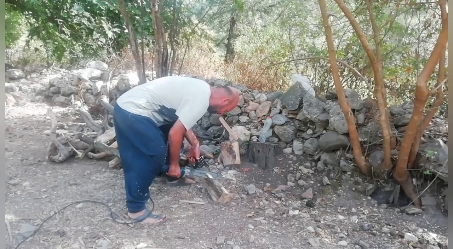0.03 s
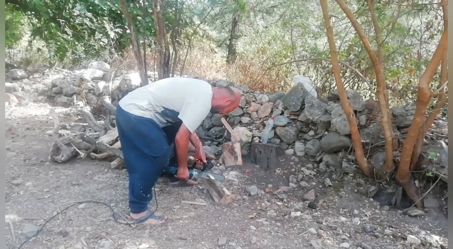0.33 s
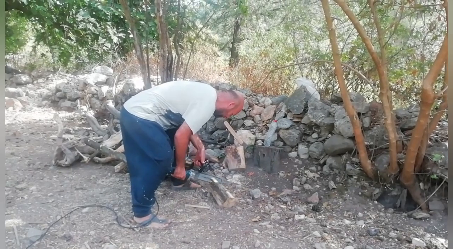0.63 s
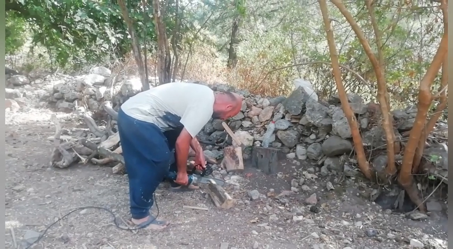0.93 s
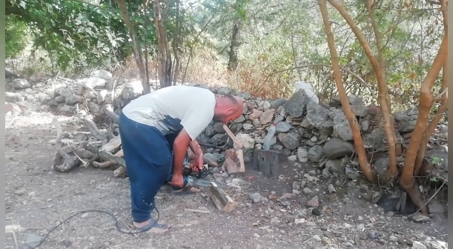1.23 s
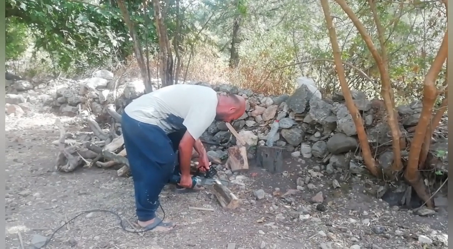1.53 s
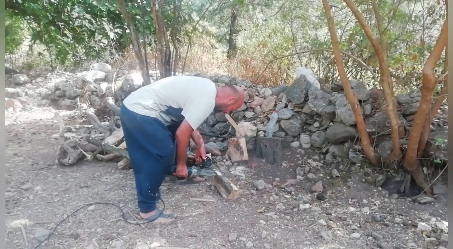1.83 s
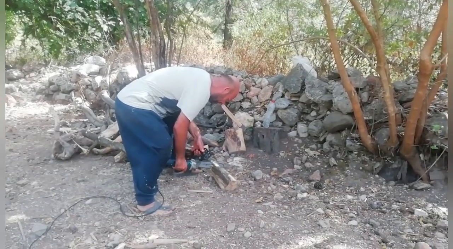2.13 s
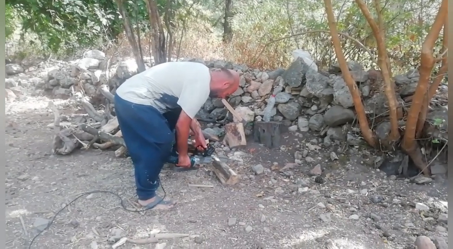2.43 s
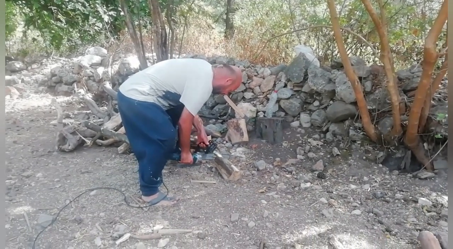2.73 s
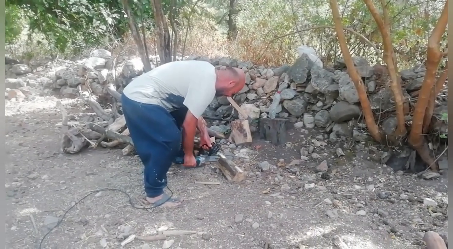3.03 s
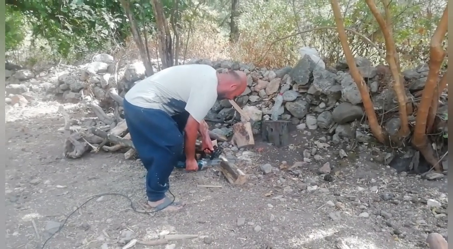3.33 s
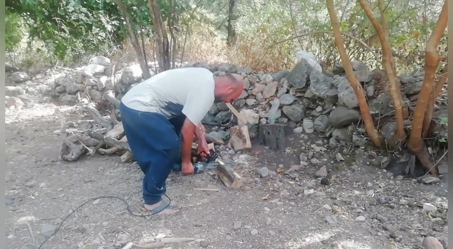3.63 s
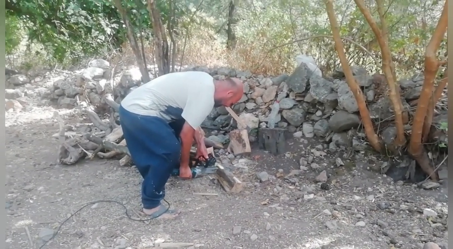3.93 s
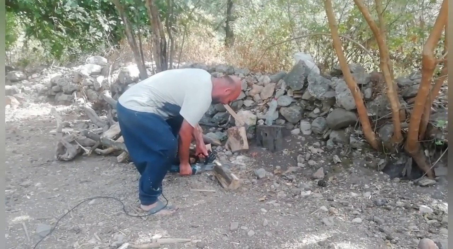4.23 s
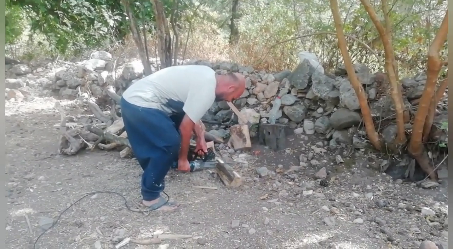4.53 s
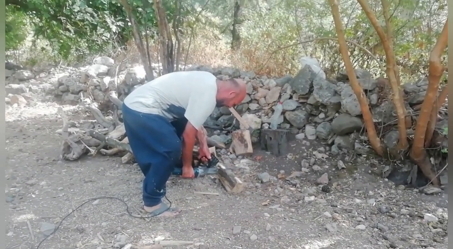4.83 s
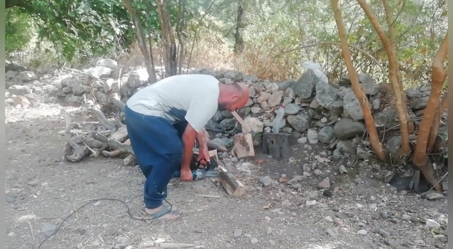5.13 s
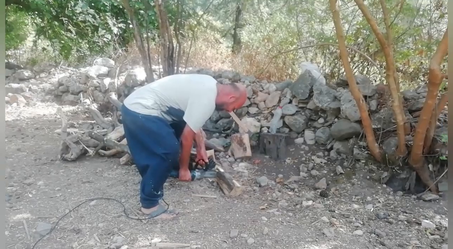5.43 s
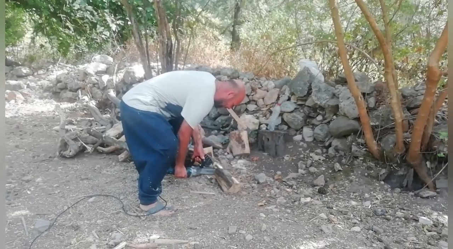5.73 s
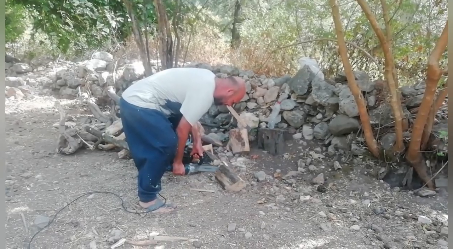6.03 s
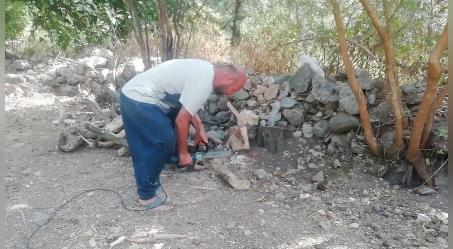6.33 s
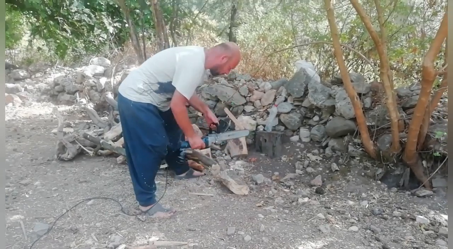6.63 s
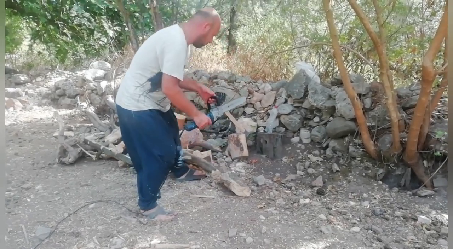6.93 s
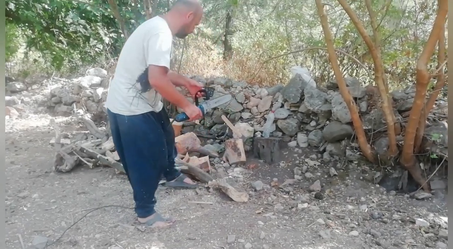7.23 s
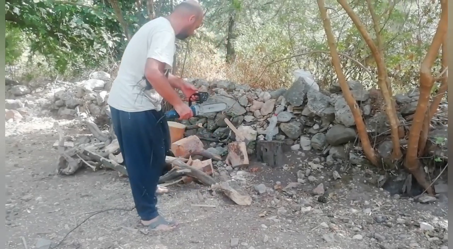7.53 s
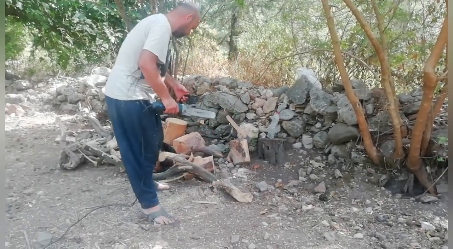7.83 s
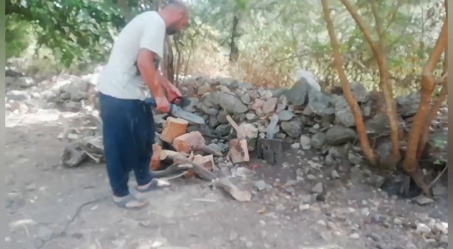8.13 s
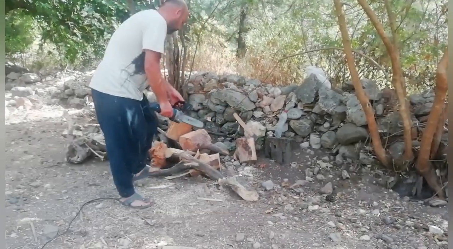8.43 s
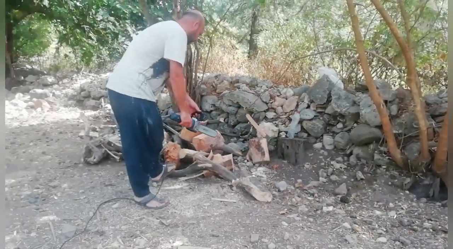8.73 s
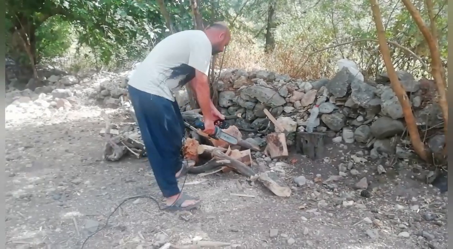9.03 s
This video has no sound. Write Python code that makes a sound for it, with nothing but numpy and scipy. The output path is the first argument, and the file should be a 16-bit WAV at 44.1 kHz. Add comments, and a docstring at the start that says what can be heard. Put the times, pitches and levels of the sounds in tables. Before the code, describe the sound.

An electric chainsaw chatters as it cuts wood, then runs free with a thinner whine, while light wind buffets the microphone.

```python
"""A small electric chainsaw cuts a log on stony ground, a few metres to the left of a stereo microphone.
The chain rattles and rings on its bar, the cutters chatter in the kerf, and the log's resonances sink
as the cut deepens. Near 6 s the saw comes free, speeds up and is lifted, so its ground echo sweeps.
Motor and fan whine underneath, stones throw back short echoes, and a breeze rumbles on the microphone."""
import sys
import numpy as np
from scipy import signal
from scipy.fft import rfft, irfft, next_fast_len
from scipy.io import wavfile
from scipy.ndimage import uniform_filter1d

SR = 44100
rng = np.random.default_rng(int(sys.argv[2]) if len(sys.argv) > 2 else 0)


def output_pcm(signal):
    """Save a mono or channel-first signal as 16-bit PCM at the path in sys.argv[1].

    Samples are clipped to [-1, 1] before scaling.
    """
    pcm = np.clip(np.atleast_2d(signal).T, -1, 1) * 32767
    wavfile.write(sys.argv[1], SR, np.round(pcm).astype(np.int16))


N = 399987

# speed of the motor: time_s, turns_per_s
MOTOR_SPEED = [(0, 425), (.8, 430), (1.5, 405), (2.1, 415), (2.8, 390), (3.8, 400), (5.85, 358),
               (6.08, 394), (6.27, 411), (6.53, 421), (6.8, 435), (7.0, 431), (7.25, 416), (7.55, 408),
               (8.0, 405.5), (8.4, 411), (9.07, 414)]
# bite of the cutters: time_s, load (0-1), bounces_per_s
CUTTER_BITE = [(0, 1, 84), (.6, 0.99, 83), (1.5, 0.9, 68.5), (2.1, 0.99, 97), (3, 0.95, 38.3),
               (4.4, 0.93, 41.3), (5.2, 0.97, 32.5), (5.87, 0.8, 38), (6.05, 0.26, 25), (6.4, 0.21, 47.3),
               (9.07, 0.02, 38)]
# chain running on the bar: time_s, relative_db
CHAIN_LEVEL = [(0, -24), (.2, -24.5), (.3, -25), (.72, -25), (.95, -26.5), (1.25, -26), (1.5, -26),
               (1.64, -28), (1.72, -25), (1.95, -25), (2.06, -26), (2.15, -24.5), (2.42, -25), (2.52, -27),
               (2.62, -24), (2.71, -24.5), (2.8, -28), (2.95, -26), (3.15, -27), (3.26, -23.5),
               (3.45, -27.5), (3.63, -24), (3.76, -28.5), (3.9, -25), (4.2, -27), (4.55, -25.5),
               (4.85, -26), (5.1, -26), (5.61, -25), (5.68, -27.5), (5.86, -24.5), (5.95, -27.5),
               (8.06, -26.5), (9.07, -27)]
# spectrum of the chain in the wood: frequency_hz, relative_db
LOADED_CHAIN_COLOUR = [(150, -15), (400, -13.5), (560, -16), (800, -13.5), (2650, -12), (4500, -9.5),
                       (6000, -6.5), (6600, -2.5), (7140, -2), (7680, -2), (8490, 3.5), (11000, -9),
                       (15800, -21)]
# spectrum of the chain in the air: frequency_hz, relative_db
FREE_CHAIN_COLOUR = [(200, -33), (600, -32), (900, -25), (2650, -24.5), (4500, -4.5), (4970, -7.5),
                     (5350, -2.5), (6000, -1), (6600, 0), (7140, 1), (7480, 3.5), (8050, 4.5), (10900, -5),
                     (12200, -12.5), (13100, -8), (14300, -13), (15200, -28), (15800, -9)]
# modes of the steel bar, levels against the chain: loaded_hz, free_hz, width_hz, loaded_db, free_db
STEEL_MODES = [(5550, 5300, 380, -19, -24), (6620, 5950, 340, -12, -14), (7800, 7930, 260, -8.5, -10),
               (8420, 8600, 300, -12, -15)]
# the bar's modes shift as it is wedged: time_s, pitch_ratio
STEEL_SHIFT = [(0, .99), (.6, 1.012), (1.3, 1.025), (1.9, .992), (2.9, .965), (3.5, .99), (4.2, 1.008),
               (4.6, .998), (5.5, 1.005), (7.3, 1.005), (8.3, .988), (9.07, 1)]
# the bar rings out: start_s, length_s, from_hz, to_hz, width_hz, level_db
STEEL_RINGS = [(1.3, .27, 8560, 8640, 520, -29), (1.28, .34, 7950, 7950, 330, -30),
               (2.25, .24, 8420, 8380, 400, -34), (4.45, .5, 7730, 7760, 260, -36),
               (5.0, .7, 7830, 7830, 260, -31), (5.2, .45, 8650, 8650, 700, -32.5),
               (6.9, .85, 7970, 8060, 170, -34), (2.93, .25, 10350, 10300, 400, -41),
               (3.15, .28, 9550, 9550, 450, -37), (6.68, .3, 9330, 9380, 400, -39),
               (6.88, .25, 5300, 5150, 260, -41)]

# how hard the cutters shake the log: time_s, level_db
CUTTER_PUSH = [(0.0, -40.5), (0.22, -30), (0.25, -36), (1.56, -40.5), (2.0, -49), (2.02, -69), (2.44, -35),
               (2.53, -56), (2.63, -37), (2.8, -41.5), (3.72, -35), (3.75, -42.5), (4.54, -37.5),
               (4.6, -39.5), (5.15, -37), (5.28, -54), (5.35, -38), (5.54, -50), (5.56, -35), (6.1, -62)]
# progress of the cut: time_s, depth (0-1)
CUT_DEPTH = [(0, 0), (2.4, .32), (3.3, .61), (3.8, .85), (5.9, 1)]
# log modes, levels against the push: uncut_hz, through_hz, width_hz, uncut_db, buried_db, through_db
WOOD_MODES = [(451, 302, 36, -7, -3.5, -15), (910, 735, 160, -8, -1.5, -2.5),
              (264.4, 208.6, 33, -10.5, -15, -9)]
# spectrum of tearing wood: frequency_hz, relative_db
TEARING_COLOUR = [(120, 3), (300, -3.5), (430, 13), (490, -12), (570, 19), (660, 6), (1000, -2.5),
                  (1500, 4.5), (2500, 0.5), (3500, -5.5), (4500, -16), (6000, -35)]
# the bar rubs and squeals in the kerf: start_s, length_s, from_hz, to_hz, width_hz, level_db
KERF_SQUEALS = [(0, 1.76, 1870, 1890, 240, -44), (.22, .36, 2290, 2290, 240, -40),
                (.3, .3, 1700, 1750, 250, -43), (.65, .26, 1895, 1880, 110, -38),
                (.85, .9, 3660, 3640, 190, -40), (1.68, .14, 3300, 3250, 150, -42),
                (2.02, .445, 3570, 3550, 220, -33.5), (2.1, .64, 4050, 4000, 400, -40),
                (2.52, .22, 3480, 3330, 140, -42), (2.87, .19, 1345, 1335, 40, -40.5),
                (3.25, .16, 1325, 1315, 40, -46), (2.4, 1.77, 2168, 2150, 220, -42),
                (2.8, 1.25, 1790, 1820, 90, -47), (3.0, .4, 800, 780, 110, -41),
                (4.9, 1.0, 212, 198, 12, -50), (2.62, .45, 4220, 4170, 220, -42),
                (3.2, 3.3, 3740, 3620, 180, -42.5), (3.8, .6, 1130, 1150, 150, -47),
                (4.85, .35, 1180, 1150, 150, -47)]
# resonances of the bar in the kerf: pitch_hz, width_hz, level_db
KERF_RESONANCES = [(1134, 160, -51.5), (1673, 240, -48.5), (1960, 160, -48), (2336, 400, -46.5),
                   (2836, 340, -46.5), (3630, 430, -46.5), (4300, 370, -48), (5380, 730, -44.5)]
# the bar bounces hard on the wood: start_s, relative_db
HARD_BOUNCES = [(3.053, -38), (3.069, -31), (3.166, -40), (3.228, -33), (3.263, -35), (3.348, -36),
                (3.403, -31), (3.433, -31), (3.591, -33), (3.624, -28), (3.645, -27), (3.706, -25.5),
                (3.827, -41), (3.934, -32), (4.029, -30.5), (4.064, -33), (4.119, -32), (4.204, -32.5),
                (4.222, -27), (4.282, -35), (4.321, -31), (4.372, -37), (4.409, -37), (4.432, -28.5),
                (4.455, -25), (4.482, -29), (4.503, -31), (4.606, -39), (4.782, -32), (4.856, -36),
                (4.897, -29.5), (4.925, -32), (4.973, -30), (4.999, -32), (5.016, -29.5), (5.044, -31),
                (5.083, -33), (5.116, -29.5), (5.129, -26), (5.154, -27), (5.339, -36), (5.554, -30),
                (5.706, -36), (5.833, -32)]
# a cutter snags: start_s, clatter_db, crack_db
CUTTER_SNAGS = [(.739, -22, -35), (1.327, -22, -32), (1.936, -21, -38), (2.407, -20, -34),
                (2.637, -23, -35), (2.93, -17, -31), (2.95, -24, -38), (3.016, -24, -37),
                (3.048, -18.5, -35), (3.119, -23, -40), (3.19, -24, -32), (3.405, -25, -33.5),
                (3.611, -25, -31), (3.669, -25, -30), (3.88, -26, -32), (3.938, -24, -32),
                (4.222, -29, -32), (4.53, -25, -40), (4.8, -28, -34), (4.998, -28, -30), (5.13, -22, -31),
                (5.158, -24, -32), (5.201, -24, -42), (5.29, -23, -40), (5.316, -24, -31),
                (5.335, -23, -39), (5.46, -25, -30), (5.578, -21, -34), (5.604, -20, -30),
                (5.665, -24, -32)]
# spectrum of the chain's clatter at a snag: frequency_hz, relative_db
CLATTER_COLOUR = [(2000, -10.5), (5000, -16), (6400, -2.5), (7100, -7), (8300, 2.5), (11000, -12.5),
                  (16000, -33)]
# spectrum of the wood's crack at a snag: frequency_hz, relative_db
CRACK_COLOUR = [(80, -30), (200, -5), (800, -3), (2300, 2), (4200, 1), (7000, -18), (12000, -30)]
# the chain sticks and chirps as the kerf closes: start_s, length_s, relative_db
KERF_CHIRPS = [(5.063, .018, -34), (5.11, .03, -32), (5.338, .018, -37), (5.357, .017, -35),
               (5.396, .015, -35), (5.426, .02, -36), (5.458, .016, -35), (5.55, .019, -28.5),
               (5.62, .019, -32), (5.66, .025, -31.5), (5.73, .018, -30), (5.75, .042, -32),
               (5.803, .024, -31.5), (5.832, .028, -32), (5.866, .02, -38), (5.895, .028, -38)]
# falling pitch of the chirps: time_s, pitch_hz
CHIRP_GLIDE = [(5.05, 1730), (5.45, 1685), (5.67, 1610), (5.9, 1555)]

# hum of the rotor: time_s, level_db
ROTOR_HUM = [(0, -52), (1.0, -50.5), (2.1, -55.5), (2.9, -50), (3.9, -57), (5.9, -55), (6.4, -51),
             (7.0, -49.5), (7.5, -48.5), (8.1, -50), (8.35, -55), (9.07, -53)]
# sprocket tone and an overtone near four times the motor speed: time_s, sprocket_db, overtone_db
MOTOR_TONES = [(0, -56, -58), (5.8, -55, -60), (6.0, -47, -60), (6.35, -47.5, -58), (6.55, -53, -56),
               (7.5, -50, -55), (7.9, -51, -45), (8.2, -52, -51), (8.5, -48, -53), (9.07, -47, -47)]
# whines of fan and gear: time_s, fan_db, gear_db
MOTOR_WHINES = [(0, -54, -58), (6.22, -52, -58), (6.32, -36, -55), (6.48, -41, -54), (6.62, -36.5, -54),
                (6.84, -35.5, -50), (7.0, -42, -38), (7.15, -44, -50), (7.45, -44, -55), (7.63, -45, -39),
                (7.85, -47, -52), (8.1, -35.5, -50), (8.25, -37.5, -50), (8.45, -42, -51), (8.75, -42, -52),
                (9.0, -40.5, -52)]
# rattle of the gear: time_s, relative_db
GEAR_LEVEL = [(5.95, -38.5), (6.4, -35.5), (6.8, -35.5), (8.1, -36), (8.5, -37.5), (9.07, -36.5)]
# spectrum of the gear rattle: frequency_hz, relative_db
GEAR_COLOUR = [(150, -60), (330, -7), (570, -4), (720, 0), (950, 4), (1400, 1.5), (2000, 2.5), (3000, 7),
               (3500, 5.5), (4200, -1), (4900, -43), (6000, -33)]
# bright, wandering peaks in the rattle of the free-running saw: pitch_hz, width_hz, relative_db
FREE_RUN_PEAKS = [(3010, 210, -28), (3740, 250, -9), (4890, 250, -6)]
# whirring bands that swell and glide with the ground echo as the running saw is lifted:
# start_s, length_s, from_hz, to_hz, width_hz, level_db
GROUND_ECHO_WHIRRS = [(6.3, 0.28, 1910, 1526, 261, -41.5), (6.53, 0.45, 990, 836, 194, -38),
                      (6.75, 0.41, 1320, 1220, 189.4, -41), (7.0, 1.4, 1022, 1114, 190, -44.5),
                      (7.1, 0.93, 1370, 1480, 228, -39.5), (8.4, 1.57, 779, 760, 150, -43),
                      (8.6, 0.9, 1290, 1600, 192, -39.5), (6.68, 0.18, 1800, 1720, 130, -44),
                      (7.0, 0.22, 1709, 1692, 110, -41)]
# thin hiss of the unloaded chain: time_s, level_db
CHAIN_SIZZLE = [(0, -80), (5.9, -70), (6.5, -60), (7.1, -51), (7.5, -42), (7.8, -56), (8.3, -57),
                (8.7, -44), (9.07, -46)]

# the ground echo comes later the higher the saw is held: time_s, lag_ms
GROUND_LAG = [(0, 1.08), (3, 0.36), (6.15, 0.43), (6.4, 0.5), (6.6, 0.96), (6.8, 1.31), (7.0, 1.8),
              (7.3, 2.12), (7.7, 1.98), (8.2, 1.73), (8.6, 1.61), (9.07, 1.34)]
# tone of the ground echo: frequency_hz, relative_db
GROUND_COLOUR = [(1500, 4.5), (2500, -9.0), (8000, -16)]
# porous ground swallows a band of the grazing sound: frequency_hz, gain_db
GROUND_NOTCH = [(450, 0), (500, -14), (590, -14), (660, 0)]
# echoes off a dry-stone wall and rocks, against the direct sound: lag_ms, level_db
STONE_ECHOES = [(2.3, -15), (3.9, -15), (7.1, -17)]
# shadow on the microphone's right port: frequency_hz, left_over_right_db
PORT_SHADOW = [(150, -1), (400, 2.5), (740, 12), (1200, 11.5), (2200, 7), (3000, 19), (4000, 6),
               (5500, 20.5), (7800, 27.5), (10000, 21.5), (13000, 16), (15500, 21)]
# the right port hears the saw later: frequency_hz, lag_rad
PORT_LAG = [(20, 0), (200, .8), (400, 1.6), (720, 3.1), (1200, 6.3), (2500, 8.6), (3500, 7.8), (4100, 9.4),
            (5500, 11.6), (6300, 16.6), (7200, 18.7), (8100, 22), (9000, 24.9), (15500, 27)]
# what reaches the right port directly: frequency_hz, share (0-1)
PORT_DIRECT = [(200, 1), (800, 0.9), (2000, 0.87), (3100, 0.4), (4100, 0.7), (5600, 0), (7000, 0.7),
               (9000, 0.3), (11000, 0.2)]
# puffs of breeze on the microphone: start_s, hold_s, level_db
BREEZE_PUFFS = [(.01, 0.03, -28.5), (.07, 0.094, -30), (0.38, 0.1, -32), (0.542, .03, -32),
                (0.595, 0.24, -41), (0.806, .05, -32), (0.918, 0.086, -34.5), (1.059, .1, -33.5),
                (1.25, 0.027, -31), (1.357, .05, -33), (1.457, .05, -33.5), (1.543, 0.033, -35.5),
                (1.602, 0.031, -28), (1.709, 0.045, -31), (1.843, .02, -37.5), (1.989, 0.12, -34.5),
                (2.305, 0.063, -41), (2.434, 0.21, -34), (2.688, .09, -38.5), (2.808, 0.019, -32.5),
                (2.941, 0.16, -43.5), (3.122, 0.23, -52), (3.742, .21, -37), (4.175, 0.089, -38.5),
                (4.332, 0.16, -32), (4.499, 0.094, -32), (4.739, 0.022, -45), (4.99, 0.074, -54),
                (5.106, 0.072, -42), (5.455, 0.047, -36), (5.575, .04, -41), (5.627, .1, -47),
                (5.801, 0.11, -37), (5.91, .08, -43), (6.035, 0.024, -36), (6.242, 0.054, -43),
                (6.311, 0.062, -35), (6.475, 0.12, -36.5), (6.636, 0.089, -35.5), (6.789, 0.031, -40),
                (7.406, 0.048, -49), (7.47, 0.025, -40), (7.58, 0.043, -40.5), (7.687, 0.068, -40),
                (7.893, 0.048, -41), (7.983, 0.072, -47), (8.117, 0.021, -39.5), (8.16, 0.029, -39.5),
                (8.269, 0.052, -39.5), (8.567, 0.076, -49), (8.952, 0.096, -47.5)]
# steady air under the puffs: time_s, level_db
BREEZE_FLOOR = [(0, -44), (2.9, -53), (3.4, -60), (5.9, -52), (7.1, -68), (7.6, -54), (9.07, -60)]
# spectrum of the wind rumble: frequency_hz, relative_db
BREEZE_COLOUR = [(12, -1), (25, -1), (55, 3.5), (100, 0), (160, -5), (230, -11.5), (350, -36), (600, -31.5)]


def chain(speed, load, bites, trim_db=-0.23, bite_db=0.9, link_db=-1.5, flutter_db=0.62, slap_db=1.23):
    """Links knock over the sprocket and along the steel bar, harder at each bite, and set it ringing."""
    (level_db,), (shift,) = in_time(CHAIN_LEVEL), in_time(STEEL_SHIFT)
    links = np.cos(angle(2.2 * speed * (1 + 0.0499 * drift(63.7))))
    push = from_db(load * bite_db * bites + link_db * links
                   + flutter_db * drift(19) + slap_db * drift(250))
    force = grains(20000, 1.75) * push
    loaded = coloured(force, LOADED_CHAIN_COLOUR)
    free = ground_echo(coloured(force, FREE_CHAIN_COLOUR))
    steel = from_db(-1.92) * (np.sqrt(load) * loaded + 1.09 * np.sqrt(1 - load) * free)
    hits = grains(6000, 5.0) * push
    for loaded_hz, free_hz, width_hz, loaded_db, free_db in STEEL_MODES:
        hz = (load * loaded_hz + (1 - load) * free_hz) * shift * (1 + 0.005 * drift(4.8))
        steel += from_db(load * loaded_db + (1 - load) * free_db) * resonance(hits, hz, width_hz)
    return from_db(level_db + trim_db) * steel + swells(STEEL_RINGS, grains(6000, 2.4) * push)


def log_cut(load, bites, grip, grip_db=2, rasp_bite_db=3, ring_bite_db=2.5, buried_depth=0.8):
    """Cutters tear out chips; each bite shakes the log, while the bar rubs and squeals in the kerf."""
    (push_db,), (depth,) = in_time(CUTTER_PUSH), in_time(CUT_DEPTH)
    push_db = push_db + grip_db * grip
    rasp_db = push_db - 3 + depth  # the rasp gains 1 dB on the way through
    tearing = grains(8000, 2.6) * from_db(rasp_bite_db * bites)
    rasp = from_db(rasp_db) * load * coloured(tearing, TEARING_COLOUR)
    hits = grains(5000, 2.05) * from_db(ring_bite_db * bites)
    rubbing = grains(2500, 2.4) * from_db(bites)
    rings = swells(KERF_SQUEALS, rubbing, bend_widths=1.3, judder_widths=0.18)
    for uncut_hz, through_hz, width_hz, *mode_db in WOOD_MODES:
        level_db = push_db + np.interp(depth, [0, buried_depth, 1], mode_db)
        hz = uncut_hz + (through_hz - uncut_hz) * depth
        rings += from_db(level_db) * resonance(hits, hz, width_hz)
    return rasp + np.sqrt(load) * rings


def clacks(load, bites, bite_db=2):
    """Chips and links knock in the kerf, hardest at each bite; its resonances wander."""
    hits = grains(560, 1.9) * from_db(bite_db * bites)
    rings = 0
    for hz, width_hz, db in KERF_RESONANCES:
        gain = from_db(db + 2.5 * drift(3))
        rings += gain * resonance(hits, hz * (1 + .022 * drift(2)), width_hz)
    return load * rings


def knocks(trim_db=1.5, narrow_db=-22, kerf_db=-21):
    """Each hard bounce of the bar rings the log, chiefly its widest mode, and more faintly the kerf."""
    (times, levels_db), (depth,) = np.transpose(HARD_BOUNCES), in_time(CUT_DEPTH)
    blows, out = np.zeros(N), 0
    blows[(times * SR).astype(int)] = from_db(levels_db + trim_db)
    widest_hz = max(mode[2] for mode in WOOD_MODES)
    for uncut_hz, through_hz, width_hz, *_ in WOOD_MODES:
        hz = uncut_hz + (through_hz - uncut_hz) * depth
        out += from_db(narrow_db if width_hz < widest_hz else 0) * ring(blows, hz, width_hz)
    for hz, width_hz, _ in KERF_RESONANCES:
        out += from_db(kerf_db) * ring(blows * rng.standard_normal(N), np.full(N, hz), width_hz)
    return out


def snags(decay_s=.006, spike_s=.0005):
    """A cutter catches: the chain clatters briefly and the wood cracks."""
    age, out = np.arange(SR // 20) / SR, 0
    shape = np.exp(-age / decay_s) + np.exp(-age / spike_s)
    times, clatter_db, crack_db = np.transpose(CUTTER_SNAGS)
    for levels_db, colour in ((clatter_db, CLATTER_COLOUR), (crack_db, CRACK_COLOUR)):
        envelope = np.zeros(N)
        for start_s, db in zip(times, levels_db):
            envelope[int(start_s * SR) + np.arange(len(age))] += from_db(db) * shape
        out += filtered(envelope * rng.standard_normal(N), rms_one(from_db(per_bin(colour))))
    return out


def chirps(trim_db=-1, squeal_db=-43):
    """The chain sticks in the closing kerf: short, rough squeaks joined by a faint squeal."""
    (hz,), now, envelope = in_time(CHIRP_GLIDE), np.arange(N) / SR, np.zeros(N)
    for start_s, length_s, db in KERF_CHIRPS:
        span = slice(*np.searchsorted(now, [start_s, start_s + length_s]))
        progress = np.clip((now[span] - start_s) / length_s, 0, 1)
        envelope[span] += from_db(db) * np.sin(np.pi * progress) ** .5
    between = from_db(squeal_db) * uniform_filter1d((envelope > 0) * 1., size=SR // 20)
    roughness = 1 + .3 * drift(120)
    tone = np.cos(angle(hz * (1 + .02 * drift(70))))
    return from_db(trim_db) * np.hypot(envelope, between) * roughness * tone


def motor(speed, load, mains, air_db=-9):
    """Rotor and sprocket give wavering tones; the gear and a ten-bladed fan whine in a hiss of air."""
    (fan_db, gear_db), (sprocket_db, overtone_db) = in_time(MOTOR_WHINES), in_time(MOTOR_TONES)
    hum_db, = in_time(ROTOR_HUM)
    # the speed is nearly steady when free and stumbles in the wood
    rotor = angle(speed * (1 + .0012 * drift(8) + .025 * load * drift(20)))
    sprocket = from_db(sprocket_db + 2.5 * drift(12)) * np.cos(1.8 * rotor + .35 * drift(18))
    overtone = from_db(overtone_db + 2.5 * drift(10)) * np.cos(4.05 * rotor + .6 * drift(20))
    hum = from_db(hum_db + (1.5 + 2 * load) * drift(15)) * np.cos(rotor + .28 * drift(20))
    # torque ripple puts side tones round the fan's whine, the upper one the stronger
    blades = np.cos(10 * rotor + .5 * np.sin(mains) + .35 * drift(40))
    blades *= (1 + .8 * np.cos(mains)) * (1 + .35 * drift(20))
    gear = from_db(gear_db) * np.cos(12 * rotor + 1.2 * drift(40))
    air = resonance(rng.standard_normal(N), 10 * speed + 40, width_hz=220)
    fan = from_db(fan_db) * (blades + from_db(air_db) * air)
    return ground_echo(sprocket + overtone, strength=0.26) + hum + gear + fan


def gear_rattle(load, mains, mains_db=-1.1, muffle_db=-4):
    """The gear rattles, pulsing with the mains: quieter under load, with bright peaks when free."""
    level_db, = in_time(GEAR_LEVEL)
    force = grains(9000, 1.1) * from_db(mains_db * np.cos(mains) + 0.85 * drift(31))
    rattle = from_db(level_db + muffle_db * load + 1) * coloured(force, GEAR_COLOUR)
    peaks = sum(from_db(db) * resonance(force, hz * (1 + 0.018 * drift(2.2)), width_hz)
                for hz, width_hz, db in FREE_RUN_PEAKS)
    return ground_echo(rattle) + from_db(level_db) * (1 - load) * peaks


def whirr_and_sizzle(sizzle_hz=15300):
    """Whirring bands swell and glide as the saw is lifted; the loose chain sizzles along its groove."""
    sizzle_db, = in_time(CHAIN_SIZZLE)
    whirrs = swells(GROUND_ECHO_WHIRRS, grains(2500, 1.9))
    sizzle = resonance(rng.standard_normal(N), np.full(N, sizzle_hz), width_hz=1100)
    return whirrs + from_db(sizzle_db) * sizzle


def ground_echo(x, strength=0.42):
    """The stony ground sends back a duller copy; the comb it makes slides as the saw is lifted."""
    lag_ms, = in_time(GROUND_LAG)
    dull = filtered(x, from_db(per_bin(GROUND_COLOUR)))
    return x + strength * np.interp(np.arange(N) - lag_ms * SR / 1000, np.arange(N), dull)


def wall_echoes(paths, sway_ms=0.082, lowest_hz=900):
    """Short echoes off the nearby stones ripple the spectrum; their lags sway as the saw moves."""
    samples, out = np.arange(N), paths.copy()
    bright = signal.sosfilt(signal.butter(2, lowest_hz, "high", fs=SR, output="sos"), paths)
    for lag_ms, db in STONE_ECHOES:
        delayed = samples - (lag_ms + sway_ms * drift(.5)) * SR / 1000
        out += from_db(db) * np.array([np.interp(delayed, samples, path) for path in bright])
    return out / np.sqrt(1 + sum(from_db(db) ** 2 for _, db in STONE_ECHOES))


def microphone(direct, scattered):
    """The left port faces the saw; the shaded right hears it late, with scatter from the stones."""
    share, shade = np.clip(per_bin(PORT_DIRECT), 0, 1), from_db(-per_bin(PORT_SHADOW))
    late = shade * share * np.exp(-1j * per_bin(PORT_LAG))
    diffuse = shade * np.sqrt(1 - share ** 2)
    centre = np.sqrt(abs(1 + late) ** 2 + diffuse ** 2) / 2  # gain of the two ports' average
    left = filtered(direct, 1 / centre)
    right = filtered(direct, late / centre) + filtered(scattered, diffuse / centre)
    return np.array([left, right])


def breeze(attack_s=.01, release_s=.013, lumps_db=3, stereo_width=0.36):
    """Puffs of air thump on the microphone, nearly alike on both sides; each rises, holds and fades."""
    now = np.arange(N) / SR
    puffs, = from_db(in_time(BREEZE_FLOOR))
    for start_s, hold_s, db in BREEZE_PUFFS:
        span = slice(*np.searchsorted(now, [start_s - attack_s, start_s + hold_s + .5]))
        age = now[span] - start_s
        rise = np.clip(age / attack_s + 1, 0, 1)
        fall = np.exp(-np.maximum(age - hold_s, 0) / release_s)
        puffs[span] = np.hypot(puffs[span], from_db(db) * rise * fall)
    mid, side = coloured(rng.standard_normal((2, N)) * from_db(lumps_db * drift(36)), BREEZE_COLOUR)
    return puffs * (mid * from_db([[.6], [-.6]]) + stereo_width * side * [[1], [-1]])


def chatter(per_s, wander=0.1562, uneven=0.79):
    """The bar bounces in the kerf: uneven bites, one per bounce, swinging about zero."""
    bounce = angle(per_s * (1 + wander * drift(13.6)))
    bites = rms_one(np.cos(bounce) + .5 * np.cos(2 * bounce))
    return np.clip(bites * (1 + uneven * drift(40)), -2, 2)


def swells(rows, force, bend_widths=0, judder_widths=0):
    """Driven resonances each swell, glide and fade; pressure bends their pitch and judder shakes it."""
    out, now, shake = np.zeros(N), np.arange(N) / SR, judder_widths * drift(17)
    for start_s, length_s, from_hz, to_hz, width_hz, db in rows:
        span = slice(*np.searchsorted(now, [start_s, start_s + length_s]))
        progress = np.clip((now[span] - start_s) / length_s, 0, 1)
        pressure = 4 * progress * (1 - progress)
        bend = bend_widths * (pressure - pressure.mean())
        hz = from_hz + (to_hz - from_hz) * progress + width_hz * (bend + shake[span])
        out[span] += from_db(db) * np.sqrt(pressure) * resonance(force[span], hz, width_hz)
    return out


def ring(force, hz, width_hz):
    """A steep-sided resonance whose centre moves; a unit click rings at a height near 1."""
    turn = np.exp(1j * angle(hz))
    lowpass = signal.butter(2, width_hz / 2, fs=SR, output="sos")
    envelope = signal.sosfilt(lowpass, (force + 1e-18) / turn)
    return (envelope * turn).real * SR / (np.sqrt(2) * width_hz)


def resonance(force, hz, width_hz):
    """A moving resonance under a sustained force; rms 1."""
    return rms_one(ring(force, hz, width_hz))


def grains(per_s, spread_db):
    """Tiny impacts of uneven size at random moments; rms 1."""
    sizes = from_db(spread_db * np.minimum(rng.exponential(1, N), 4)) * rng.choice([-1, 1], N)
    return rms_one(sizes * (rng.random(N) < per_s / SR))


def drift(rate_hz):
    """A smooth random wander, drawn every 40 samples; rms near 1."""
    pole = np.exp(-80 * np.pi * rate_hz / SR)
    noise = rng.standard_normal(N // 40 + 2002)
    slow = signal.lfilter([1], [1, -2 * pole, pole * pole], noise)[2000:]
    return np.interp(np.arange(N) / 40, np.arange(len(slow)), rms_one(slow))


def coloured(x, spectrum):
    """Give a sound a spectrum; rms 1."""
    return rms_one(filtered(x, from_db(per_bin(spectrum))))


def filtered(x, response):
    """Pass a sound through a frequency response."""
    size = next_fast_len(N + SR // 4, True)
    return irfft(rfft(x, size) * response, size)[..., :N]


def per_bin(points):
    """A table over log frequency, read at every bin of a padded transform."""
    hz, value = np.transpose(points)
    size = next_fast_len(N + SR // 4, True)
    return np.interp(np.log(np.arange(size // 2 + 1) * SR / size + 1e-3), np.log(hz), value)


def in_time(rows):
    """Each column of a curve, sample by sample."""
    time_s, *columns = np.transpose(rows)
    return [np.interp(np.arange(N) / SR, time_s, column) for column in columns]


def angle(per_s):
    """Running phase of a rotation."""
    return 2 * np.pi * np.cumsum(per_s) / SR


def from_db(db):
    """Decibels to gain."""
    return 10 ** (np.asarray(db) / 20)


def rms_one(x):
    """Scale to rms 1."""
    return x / np.sqrt(np.mean(x ** 2) + 1e-20)


def scene():
    """Saw and log a few metres to the left, stones around them, breeze on the microphone."""
    (speed,), (load, bounces_per_s) = in_time(MOTOR_SPEED), in_time(CUTTER_BITE)
    bites = chatter(bounces_per_s)
    grip = drift(9)  # the hand's pressure is never quite even
    mains = angle(np.full(N, 100))  # 100 Hz torque ripple
    # direct and scattered sound follow the same strokes, each with a fine grain of its own
    paths = np.array([chain(speed, load, bites) + gear_rattle(load, mains) + motor(speed, load, mains)
                      + whirr_and_sizzle() + log_cut(load, bites, grip) + snags() + chirps()
                      for _ in range(2)])
    paths = paths + clacks(load, bites) + knocks()
    direct, scattered = filtered(wall_echoes(paths), from_db(per_bin(GROUND_NOTCH)))
    return microphone(direct, scattered) + breeze()


def record(dry, ceiling=.8, cutoff_hz=15850):
    """The rare tall peaks are rounded and the top is cut steeply."""
    rounded = dry / (1 + (dry / ceiling) ** 6) ** (1 / 6)
    return signal.sosfilt(signal.ellip(12, .1, 90, cutoff_hz, fs=SR, output="sos"), rounded)


dry = scene()
out = record(dry)
output_pcm(out)
```